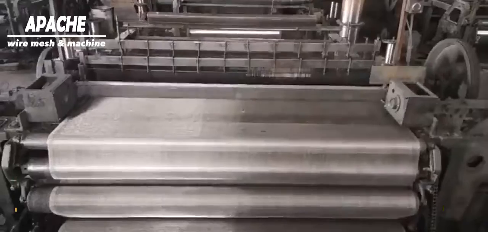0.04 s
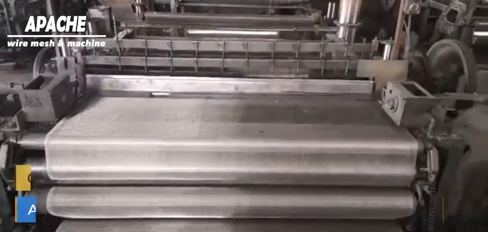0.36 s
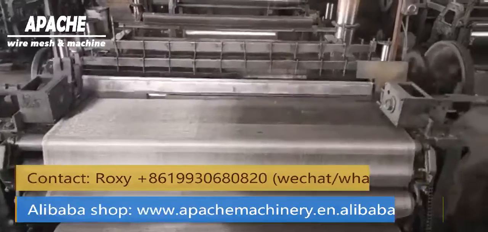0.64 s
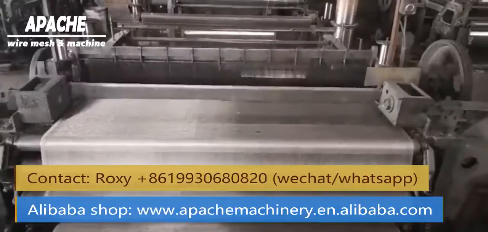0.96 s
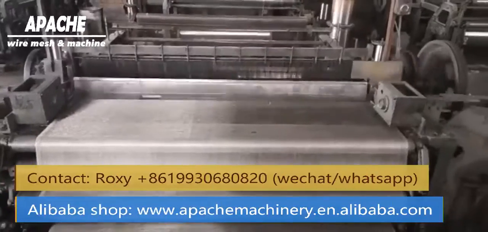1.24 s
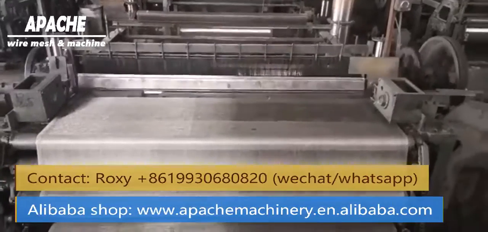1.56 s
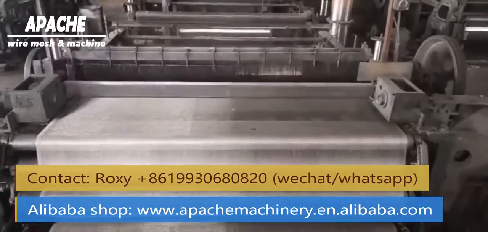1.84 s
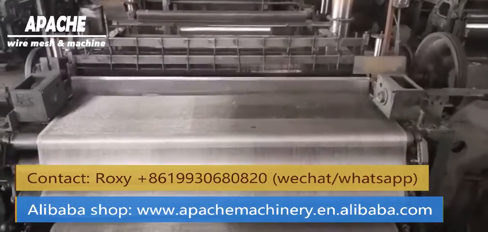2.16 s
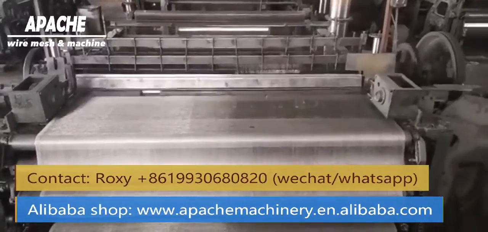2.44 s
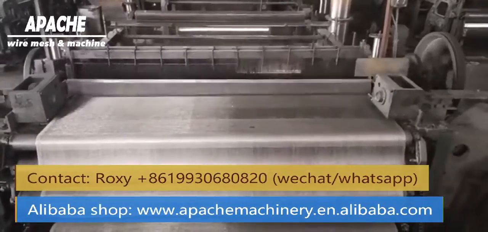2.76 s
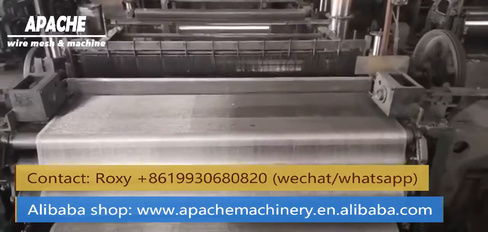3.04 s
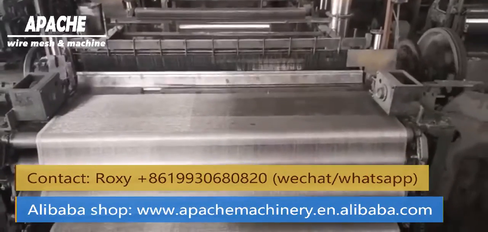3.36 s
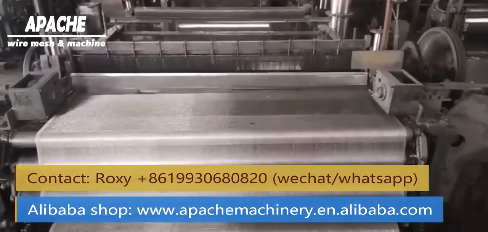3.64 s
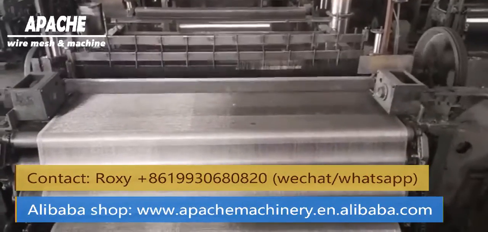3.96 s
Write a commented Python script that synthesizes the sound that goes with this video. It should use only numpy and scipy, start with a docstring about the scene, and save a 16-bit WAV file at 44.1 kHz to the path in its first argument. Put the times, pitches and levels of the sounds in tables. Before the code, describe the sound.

A wire mesh loom cuts in abruptly at about 0.35 seconds and runs close by until the end, around 4 seconds. Its wires rustle and jingle, swelling slightly about once a second. Sharp steel clacks and dull frame knocks come several times a second, with faint, brief singing of rubbed metal. Throughout, other looms blur into a dense, steady roar in a hard-walled factory hall.

```python
"""A hard-walled factory hall full of looms, whose blows merge into a roar.
Close by, a loom weaves wire mesh at about one pick (one pass of the cross wire) a second.
Its wires and heddles (the guides that lift them) rustle with each pick, small steel parts
jingle and sing, bigger ones clack, and the heavy frame knocks.
The sound is mono, cuts in abruptly and has no top octave apart from three faint ticks."""
import sys
import numpy as np
from scipy import signal
from scipy.fft import rfft, irfft
from scipy.io import wavfile

SR = 44100
rng = np.random.default_rng(int(sys.argv[2]) if len(sys.argv) > 2 else 0)


def to_wav(sig):
    """Store sig (one row per channel, or 1-D mono) as 16-bit WAV at the path in sys.argv[1].

    Samples outside -1..1 are clipped; the rate is SR.
    """
    pcm = np.clip(np.atleast_2d(sig), -1, 1) * 32767
    pcm = np.round(pcm).astype(np.int16)
    wavfile.write(sys.argv[1], SR, pcm.T)  # frames by channels


N = 176400
TIME = np.arange(N) / SR

# The tone of the hall's roar, the wire rustle, the steel clacks and the frame knocks.
# Each row: frequency in Hz, relative strength in dB.
ROAR_SPECTRUM = [(25, -18), (60, -14.5), (120, -8.5), (200, -7.5), (260, -3), (310, -3), (375, 1.5),
                 (490, -2), (565, 0.5), (680, -7), (850, -8.5), (1500, -8.5), (2500, -8), (7600, -21)]
RUSTLE_SPECTRUM = [(900, -29), (1600, -13), (2050, -6.5), (2400, -3), (3050, -5.5), (4200, -4.5),
                   (4900, -1.5), (5600, 2), (6050, -1), (6300, -2), (7050, 0.5), (7500, 1)]
CLACK_SPECTRUM = [(300, -10.5), (1000, -2), (2400, 5), (4000, 5.5), (5600, -1.5), (7600, -1.5)]
KNOCK_SPECTRUM = [(50, -13.5), (150, -9), (290, -1), (390, -7.5), (570, 0), (800, -4.5), (1300, -5),
                  (2200, -11.5), (5000, -22)]
# How the roar and the rustle rise and fall. Each row: time in seconds, relative level in dB.
# Only a share of each rise and fall is used (see swing).
ROAR_SWELLS = [(0.4, -46.5), (0.68, -44), (0.79, -49.5), (0.82, -43.5), (1.27, -45.5), (1.35, -39.5),
               (1.51, -46), (1.89, -40.5), (1.9, -51.5), (1.94, -46), (3.21, -46), (3.52, -47.5),
               (3.53, -43), (3.93, -46.5)]
RUSTLE_SWELLS = [(0.4, -37), (0.41, -37), (0.9, -29), (1.14, -37), (1.8, -30), (2.32, -42), (2.59, -32.5),
                 (2.68, -38), (2.78, -32.5), (3.3, -37), (3.36, -41.5), (3.56, -33.5), (3.57, -37),
                 (3.95, -32.5)]
# Faint, thin ticks. Each row: time in seconds, level in dB before dulling.
TICK_EVENTS = [(.9928, -23), (1.1535, -30), (2.353, -35)]
# Steel parts kept ringing by the shaking. Each entry: pitch in Hz.
SHAKEN_HZ = [2355, 2540, 3588, 4275, 4668, 6100]
# The same parts, in the same order. Each row: level in dB, width of the tone in Hz.
SHAKEN_TONES = [(-62, 110), (-62.5, 100), (-56, 40), (-58.5, 28), (-57.5, 18), (-51, 70)]
# Rubbed steel singing. Each row: middle in seconds, length in seconds, pitch in Hz, level in dB.
RUBBED_TONES = [(.56, .16, 7450, -49), (.91, .22, 3600, -45), (1.01, .12, 7480, -46),
                (1.62, .26, 7380, -45), (2.04, .16, 2620, -46), (2.03, .08, 4270, -48),
                (2.26, .14, 2430, -47), (2.82, .14, 7420, -47), (3.75, .08, 7520, -48)]
# Knocks in the heavy frame. Each row: start in seconds, relative level in dB.
FRAME_BLOWS = [(0.38, -40.5), (.53, -42), (0.605, -35.5), (.669, -36.5), (.814, -35), (.895, -36.5),
               (1.042, -43), (1.12, -38.5), (1.295, -37), (1.362, -42), (1.633, -37), (1.799, -43),
               (1.865, -52), (2.559, -34), (2.76, -36), (3.018, -38), (3.157, -38), (3.533, -44),
               (3.641, -40)]
# Clacks of the near loom. Each row: start in seconds, relative level in dB,
# pitch of the ring in Hz, extra level for the ring in dB.
STEEL_BLOWS = [(0.379, -30.5, 2990, -7.5), (0.461, -38, 5100, -3), (.603, -47, 2980, -29),
               (0.688, -39, 2990, -12), (0.703, -33.5, 2500, -4.5), (.8133, -36.5, 3580, -8),
               (0.967, -35, 7550, 5), (1.1983, -49, 5650, 10), (1.2937, -37, 3390, -5),
               (1.5745, -35, 3850, -6), (1.7277, -39.5, 1860, -0.5), (1.785, -29, 4060, -15.5),
               (2.014, -36.5, 2650, -6.5), (2.1847, -49.5, 5420, 15), (2.233, -33.5, 2430, -10),
               (2.4656, -42.5, 3930, 0.5), (2.5514, -57, 2650, -13), (2.758, -44, 5080, -9),
               (2.808, -50, 7680, 15), (2.888, -36, 2430, -8), (2.964, -34, 3990, -11),
               (3.0896, -45, 5580, 3), (3.158, -37, 2420, 2.5), (3.5342, -36.5, 5640, -5),
               (3.7447, -29.5, 7800, -16), (3.9815, -39, 6630, 0.5)]


def from_db(db):
    """Turn decibels into a gain to multiply by."""
    return 10 ** (np.asarray(db) / 20)


def rms_one(x):
    """Scale a signal so its average level (rms) is 1."""
    return x / np.sqrt(np.mean(x ** 2) + 1e-20)


def level_curve(rows, swing):
    """A gain that follows the rows around their average; swing is the share of the movement kept."""
    db = np.interp(TIME, *np.transpose(rows))
    return from_db(swing * (db - db.mean()))


def colour(x, spectrum):
    """Give a signal the tone of a spectrum table, at average level 1."""
    hz, db = np.transpose(spectrum)
    bin_hz = np.arange(N // 2 + 1) * SR / N + 1e-3
    bass_cut = np.minimum(bin_hz / hz[0], 1) ** 2
    gain = from_db(np.interp(np.log(bin_hz), np.log(hz), db))
    return rms_one(irfft(rfft(x) * bass_cut * gain, N))


def drift(rate_hz):
    """A smooth random wobble of about plus or minus 1."""
    step, warm_up = 40, 2000  # one value every 40 samples; the first 2000 are thrown away
    pole = np.exp(-2 * np.pi * rate_hz * step / SR)
    noise = rng.standard_normal(N // step + warm_up + 2)
    slow = signal.lfilter([1], [1, -2 * pole, pole ** 2], noise)[warm_up:]
    return np.interp(np.arange(N) / step, np.arange(len(slow)), rms_one(slow))


def ringing_noise(hz, width_hz):
    """Noise that rings around one pitch; the smaller the width, the purer the tone."""
    pole = np.exp(-np.pi * width_hz / SR)
    feedback = [1, -2 * pole * np.cos(2 * np.pi * hz / SR), pole ** 2]
    return rms_one(signal.lfilter([1, 0, -1], feedback, rng.standard_normal(N)))


def decay(starts, db, fade_s):
    """The loudness of blows that start at once, then fall by 60 dB in fade_s seconds."""
    power = np.zeros(N)
    samples = np.clip(np.atleast_1d(starts) * SR, 0, N - 1).astype(int)
    np.add.at(power, samples, from_db(db) ** 2)
    kept_per_sample = from_db(-60 / (fade_s * SR)) ** 2
    return np.sqrt(signal.lfilter([1], [1, -kept_per_sample], power + 1e-18))


def patchy_noise(wobble_db, rate_hz):
    """Noise whose half-octave bands each swell and sink on their own."""
    white = rfft(rng.standard_normal(N))
    hz = np.arange(N // 2 + 1) * SR / N
    band = np.floor(2 * np.log2(np.clip(hz, 64, 8000)))
    return sum(irfft(white * (band == k), N) * from_db(wobble_db * drift(rate_hz))
               for k in np.unique(band))


def hall_roar(level_db=-39.5):
    """The blows of all the machines, blurred into one roar by the hard walls."""
    noise = colour(patchy_noise(wobble_db=1.46, rate_hz=14), ROAR_SPECTRUM)
    return from_db(level_db) * level_curve(ROAR_SWELLS, swing=0.61) * noise


def far_clatter(blows_per_s=40, level_db=-43):
    """Weaker clacks from the looms around, at random moments."""
    struck = rng.random(N) < blows_per_s / SR
    blow_db = 2 * rng.standard_normal(N)
    loudness = rms_one(decay(TIME[struck], blow_db[struck], fade_s=0.12))
    return from_db(level_db) * loudness * colour(rng.standard_normal(N), CLACK_SPECTRUM)


def thin_ticks():
    """Single sharp clicks, slightly dulled."""
    starts, db = np.transpose(TICK_EVENTS)
    clicks = np.zeros(N)
    clicks[(starts * SR).astype(int)] = from_db(db)
    return signal.lfilter([1], [1, -0.4], clicks + 1e-18)


def shaken_steel():
    """The shaking keeps steel parts ringing with faint, narrow tones."""
    return sum(from_db(db) * ringing_noise(hz, width_hz)
               for hz, (db, width_hz) in zip(SHAKEN_HZ, SHAKEN_TONES))


def rubbed_steel():
    """Where steel is rubbed, it sings with a tone that briefly swells and fades."""
    out = np.zeros(N)
    for middle, length, hz, db in RUBBED_TONES:
        swell = np.cos(np.pi * np.clip((TIME - middle) / length, -0.5, 0.5))
        out += from_db(db) * swell * ringing_noise(hz, width_hz=54)
    return out


def frame_knocks(gain_db=-3):
    """Dull blows in the heavy frame, spread by the hall."""
    starts, db = np.transpose(FRAME_BLOWS)
    return decay(starts, db + gain_db, fade_s=0.27) * colour(rng.standard_normal(N), KNOCK_SPECTRUM)


def jingle(touches_per_s=420, low_hz=901.6, high_hz=7550, spread_db=10, fade_s=0.14):
    """Many small steel parts are touched at random; each rings briefly at a pitch of its own."""
    out = np.zeros(N + SR)
    t = TIME[:SR // 5]
    for when, pitch, size, phase in rng.random((int(touches_per_s * N / SR), 4)):
        start = int(when * N)
        hz = low_hz + pitch * (high_hz - low_hz)
        loudness = from_db(spread_db * size ** 2 - 60 * t / fade_s)
        out[start:start + len(t)] += loudness * np.sin(2 * np.pi * (hz * t + phase))
    return rms_one(out[:N])


def wire_rustle(touches_per_s=1500, level_db=-31):
    """Wires and heddles touch countless times: sharp ticks, their blur in the hall, and a jingle."""
    touches = (rng.random(N) < touches_per_s / SR) * rng.choice([-1, 1], N)
    touch_db = 5.1 * np.minimum(rng.exponential(1, N), 3)  # most are soft, a few are loud
    ticks = rms_one(touches * from_db(touch_db))
    hall_blur = rms_one(patchy_noise(wobble_db=0.7, rate_hz=16))
    rustle = from_db(-8.5) * ticks + hall_blur + from_db(-7.5) * jingle()
    return from_db(level_db) * level_curve(RUSTLE_SWELLS, swing=0.38) * colour(rustle, RUSTLE_SPECTRUM)


def steel_clacks(burst_gain_db=-2.5, ring_gain_db=1.5):
    """Steel parts of the near loom collide: a rattling burst, and a short ring of the struck part."""
    starts, levels_db, _, _ = np.transpose(STEEL_BLOWS)
    rattle = colour(rng.standard_normal(N), CLACK_SPECTRUM)
    out = decay(starts, levels_db + burst_gain_db, fade_s=0.22) * rattle
    for start, db, ring_hz, extra_db in STEEL_BLOWS:
        loudness = decay(start, db + extra_db + ring_gain_db, fade_s=0.15)
        out += loudness * ringing_noise(ring_hz, width_hz=180)
    return out


def scene():
    """The hall and the near loom reach one microphone; both channels are alike."""
    mono = hall_roar() + wire_rustle() + steel_clacks() + frame_knocks()
    mono += far_clatter() + shaken_steel() + rubbed_steel()
    return np.stack([mono, mono])


def record(dry, start_s=0.3488, fade_in_s=0.005, din_top_hz=7590, tick_top_hz=15800):
    """The din cuts in and loses its top octave; three thin ticks lie over it and reach higher."""
    opened = dry * np.clip((TIME - start_s) / fade_in_s, 0, 1)
    din_low_pass = signal.ellip(14, 0.1, 70, din_top_hz, fs=SR, output="sos")
    final_low_pass = signal.ellip(10, 0.1, 70, tick_top_hz, fs=SR, output="sos")
    din = signal.sosfilt(din_low_pass, opened)
    return signal.sosfilt(final_low_pass, din + thin_ticks())


dry = scene()
out = record(dry)
to_wav(out)
```